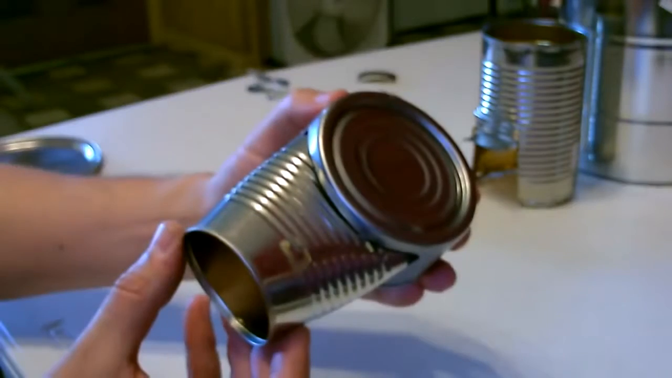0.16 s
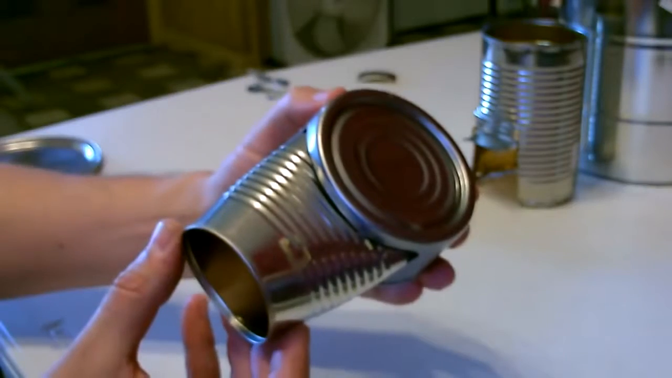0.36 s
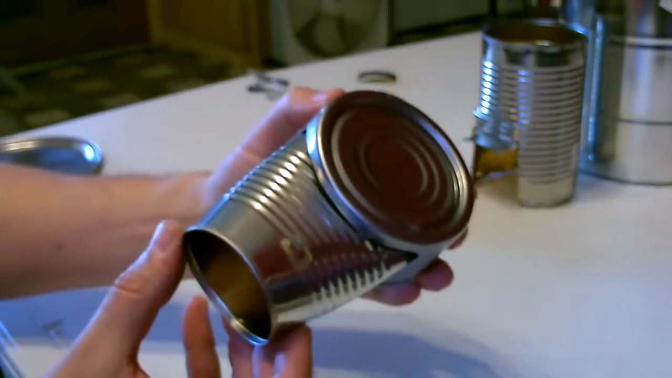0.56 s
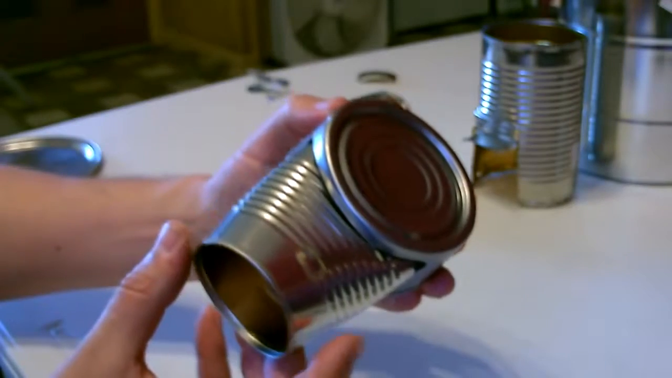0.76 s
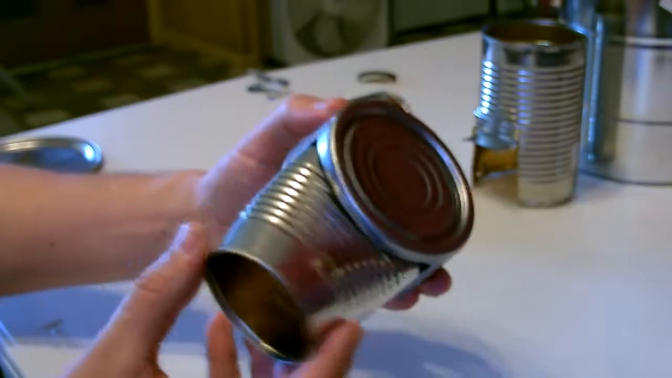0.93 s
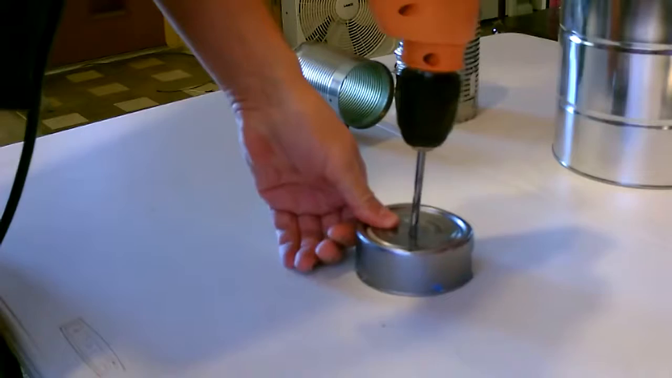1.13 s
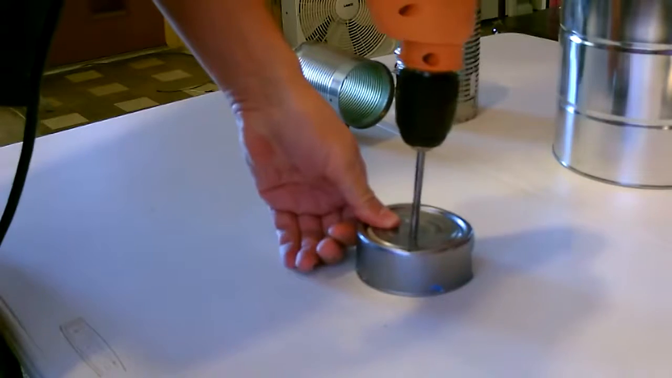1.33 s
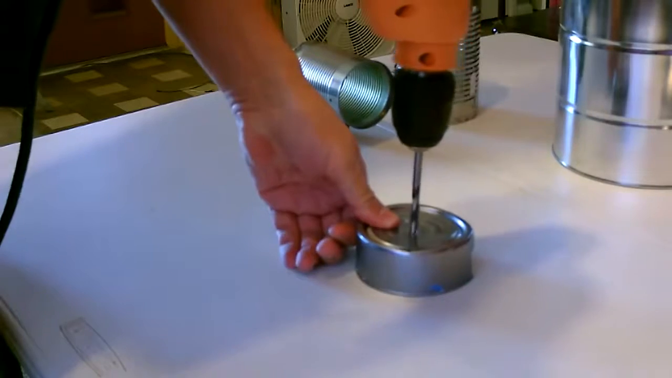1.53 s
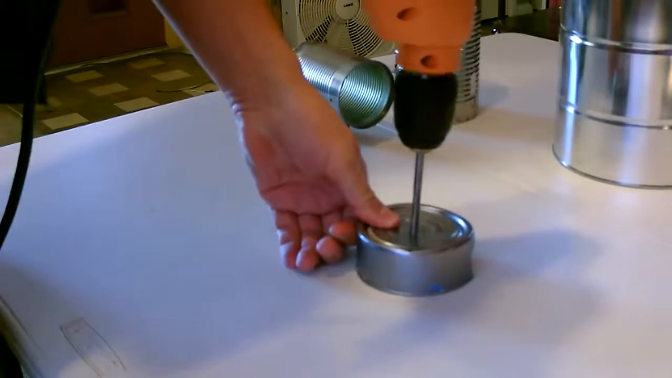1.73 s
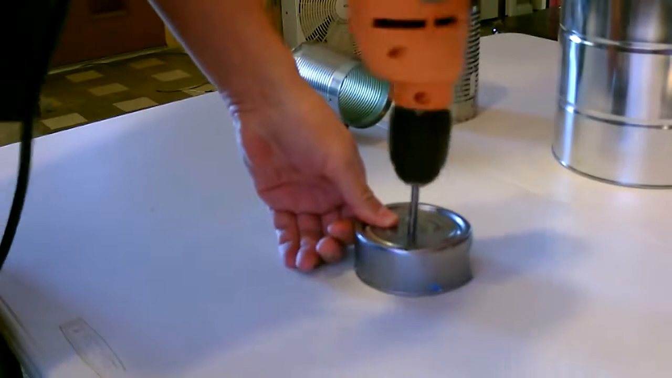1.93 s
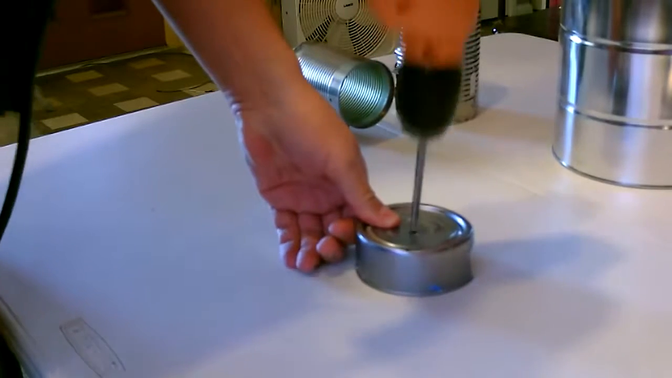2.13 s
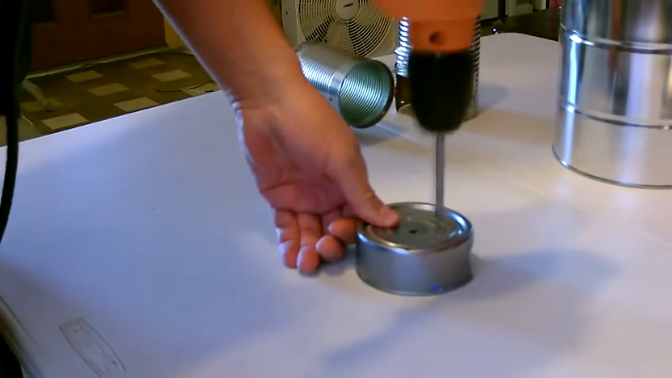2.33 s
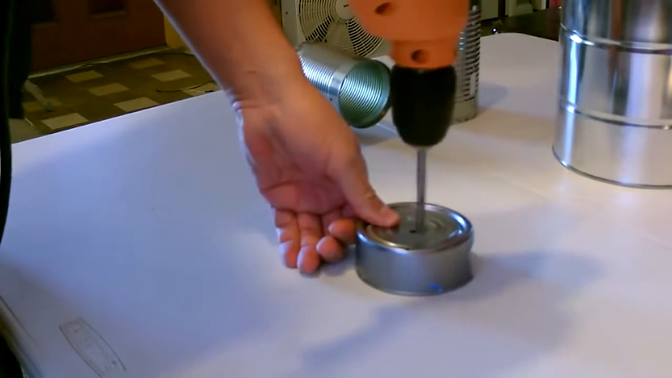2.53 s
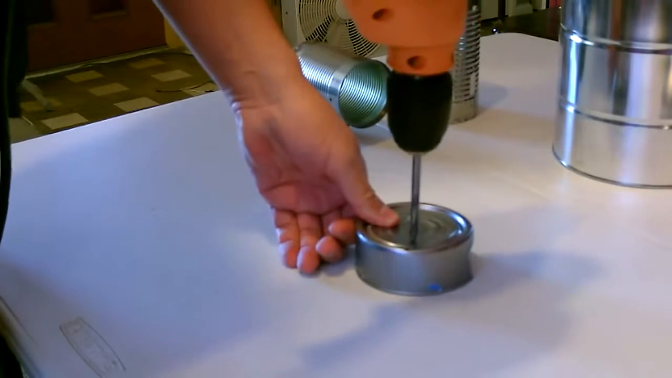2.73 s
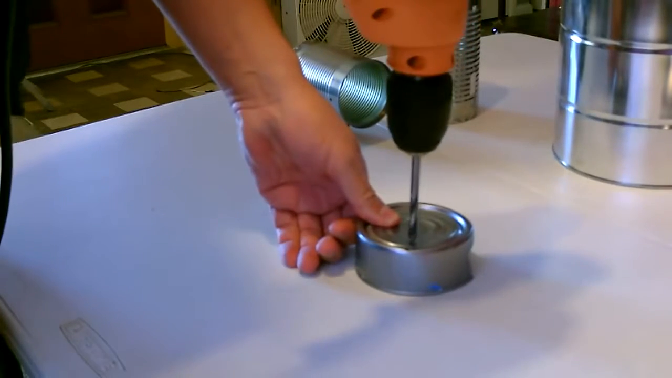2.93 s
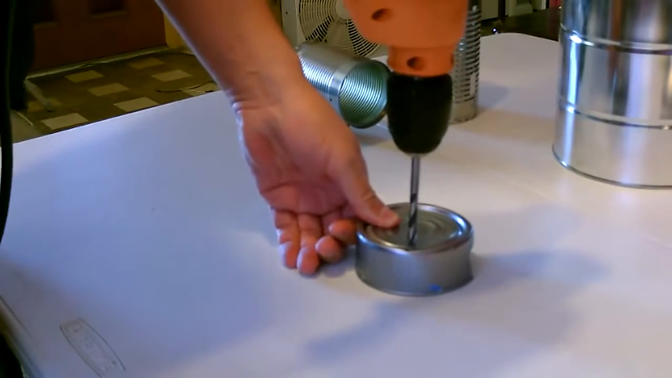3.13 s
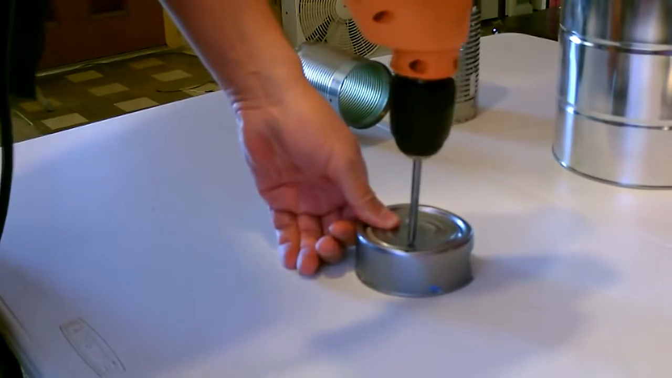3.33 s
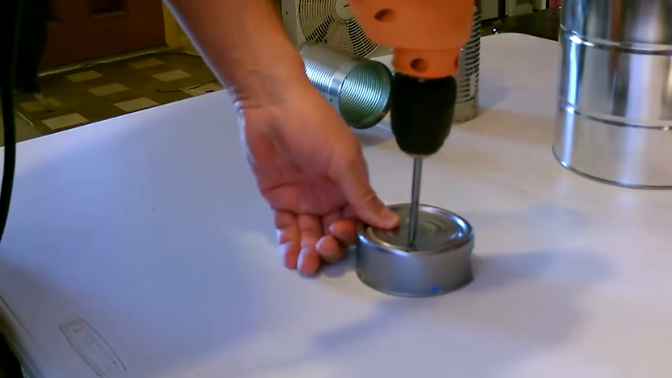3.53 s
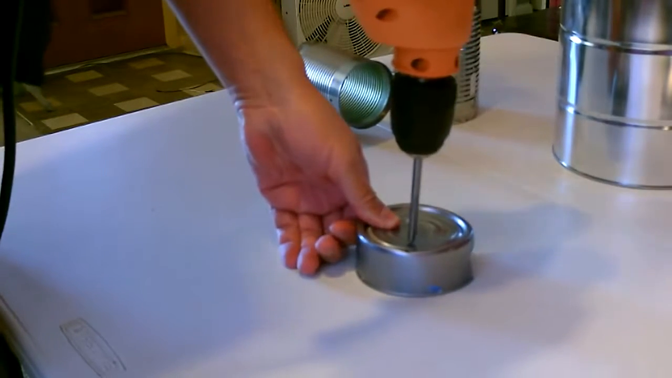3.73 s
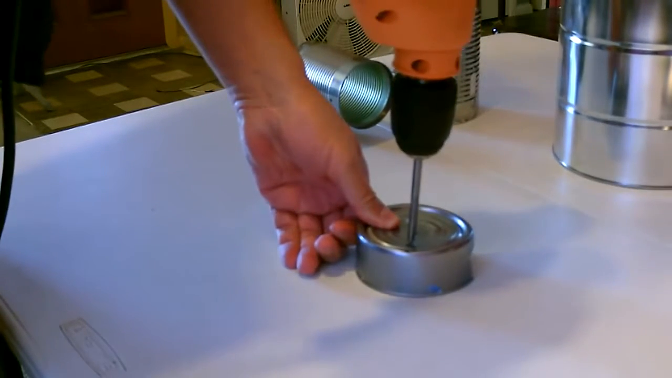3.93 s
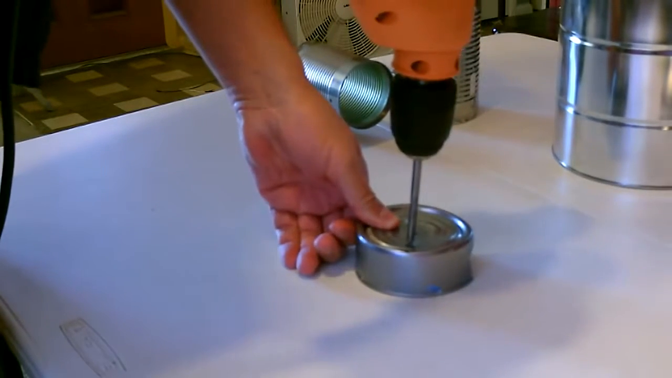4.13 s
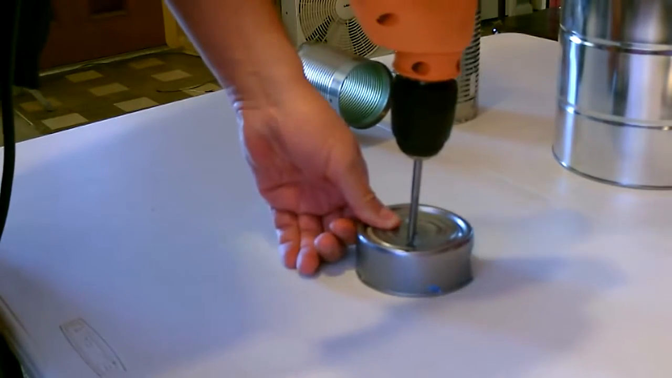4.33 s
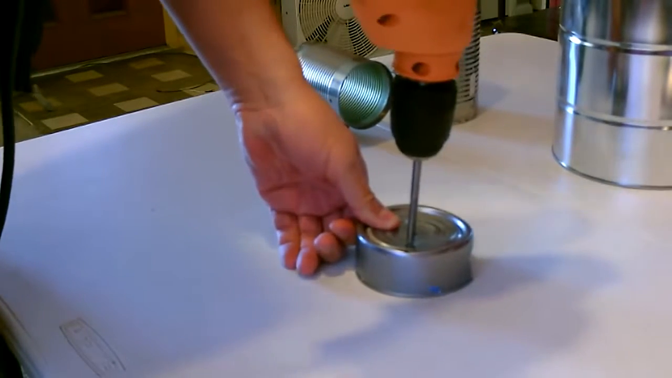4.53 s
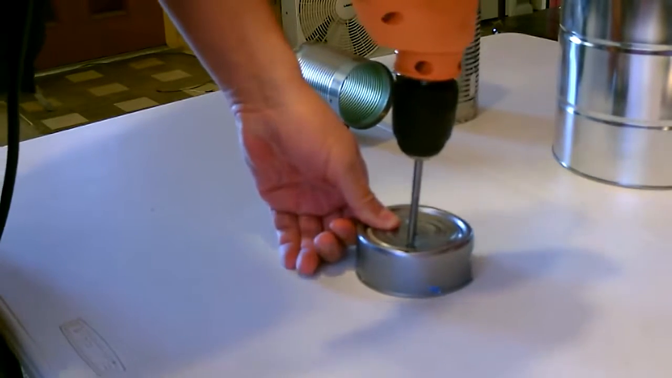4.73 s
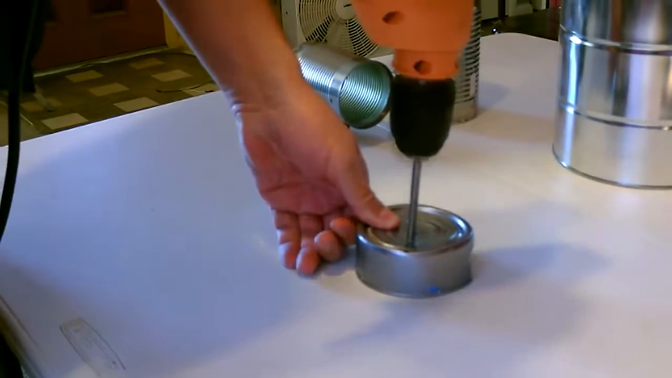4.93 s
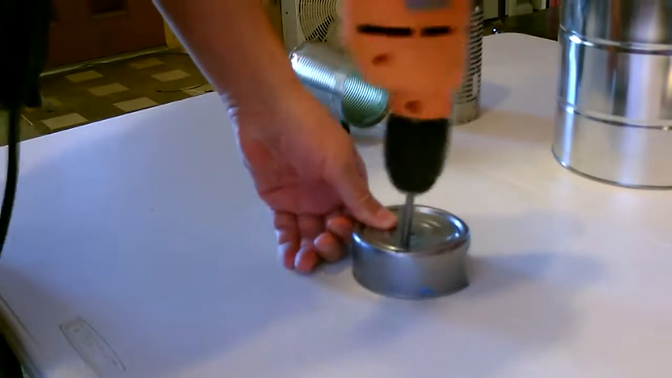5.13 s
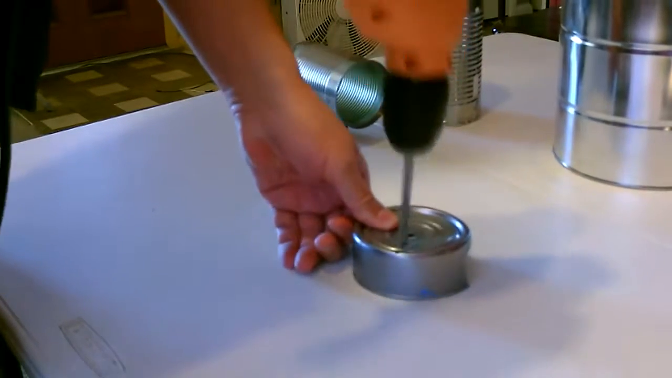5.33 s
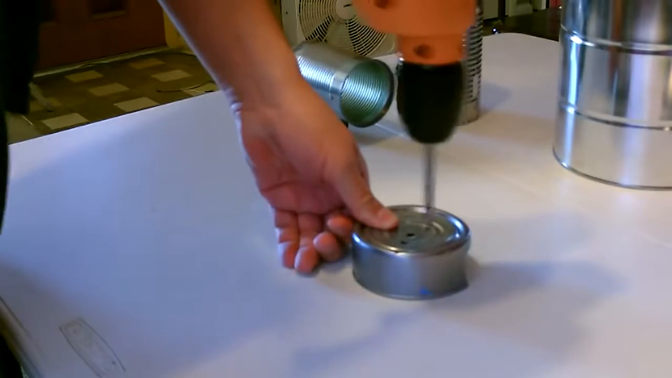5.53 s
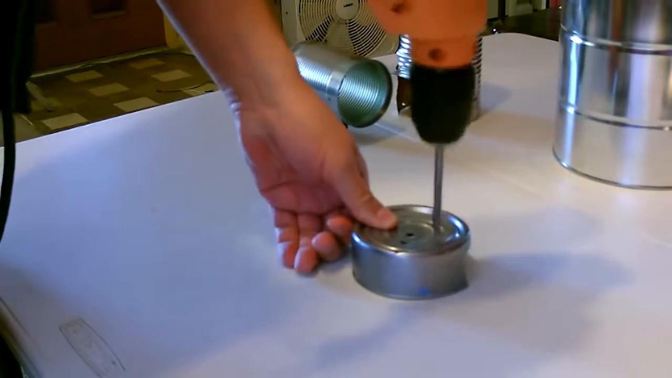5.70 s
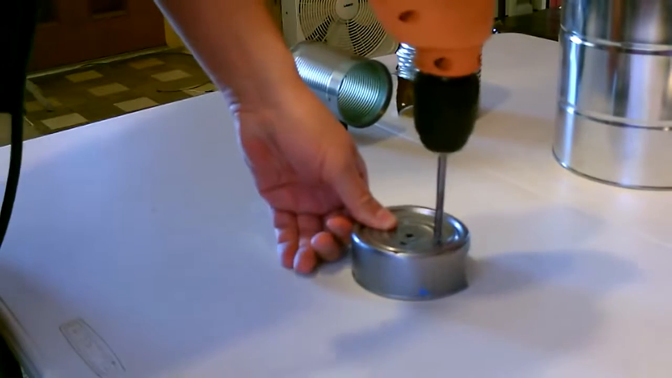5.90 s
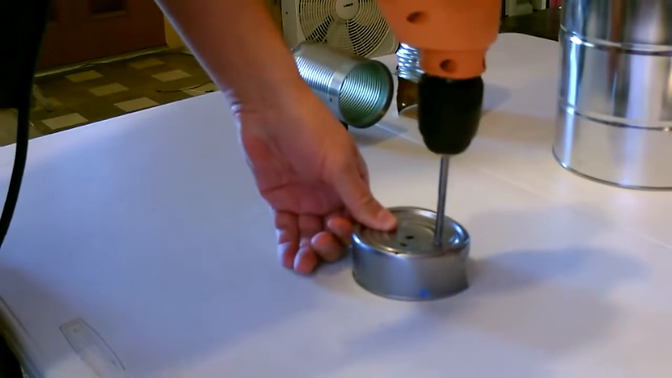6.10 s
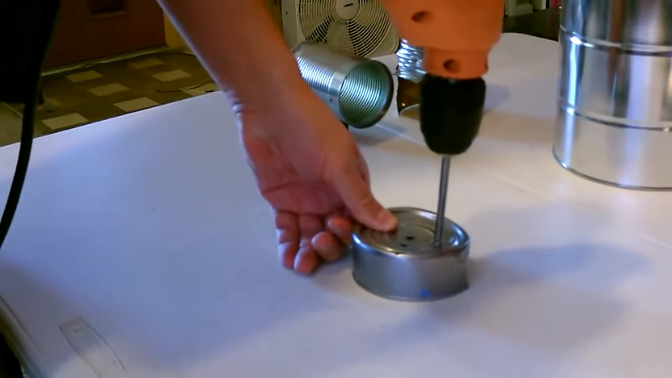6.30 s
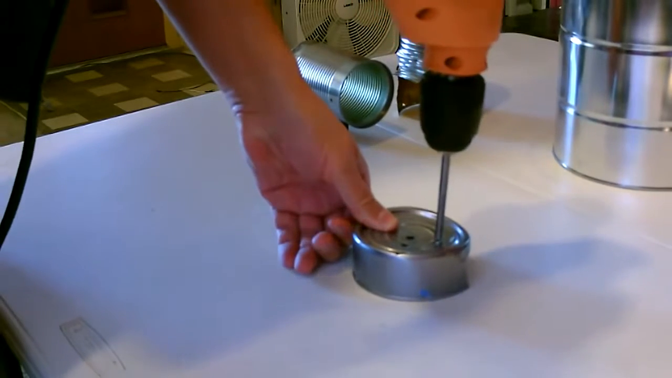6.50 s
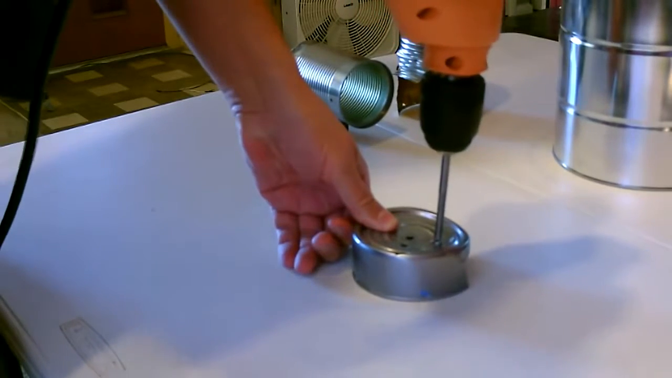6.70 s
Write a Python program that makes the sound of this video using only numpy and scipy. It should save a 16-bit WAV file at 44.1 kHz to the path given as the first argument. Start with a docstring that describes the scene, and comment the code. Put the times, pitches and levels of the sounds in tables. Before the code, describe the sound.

After a second of soft fan air, a corded drill snarls in bursts on thin steel, squealing briefly, clattering on breakthrough and winding down.

```python
"""Drilling through a steel can

A corded drill, squeezed in short bursts, bores through the base of an upturned steel can on a table.
The motor whine is a set of sines that rise under mains power and slide down as it coasts. Gears, cutting
edge and table are noisy contacts shaking resonances; can knocks, gear ticks and trigger clicks are struck
modes. A floor fan breathes in the room as smooth shaped noise, joined by a faint steady hum."""
import sys
import numpy as np
from scipy import signal
from scipy.fft import rfft, irfft, next_fast_len
from scipy.io import wavfile
from scipy.ndimage import uniform_filter1d

SR = 44100
rng = np.random.default_rng(int(sys.argv[2]) if len(sys.argv) > 2 else 0)


def to_wav(s):
    """Save 16-bit WAV."""
    ch = np.atleast_2d(s).T  # columns
    pcm = np.round(np.clip(ch, -1, 1) * 32767)  # PCM
    wavfile.write(sys.argv[1], SR, pcm.astype(np.int16))


def gain_from_decibels(decibels):
    """Convert decibel values to linear amplitude factors."""
    exponent = np.asarray(decibels, float) / 20
    return 10 ** exponent


N = 298116   # length in samples

# motor speed: t/s, commutator pitch f/Hz
MOTOR_SPEED = [(1.26, 120.6), (1.34, 1650), (1.39, 2300), (1.63, 599.2), (1.74, 299.3), (1.81, 2050),
               (1.89, 2826), (2.0, 2420), (2.2, 1910), (2.45, 1535), (2.92, 600), (3.2, 279), (3.3, 120),
               (3.45, 120.4), (3.52, 1860), (3.57, 2292), (3.61, 2456), (3.67, 2170), (4.0, 1420),
               (4.28, 790), (4.32, 812), (4.4, 1930), (4.46, 2150), (4.56, 1860), (4.8, 1830), (4.89, 2855),
               (4.94, 3140), (5.1, 2500), (5.3, 2010), (5.6, 1425), (5.93, 770), (6.05, 590), (6.3, 690),
               (6.35, 1788), (6.41, 2510), (6.5, 3500), (6.55, 3795), (6.76, 3560)]
# gear housing resonances: f/Hz, width/Hz, relative level/dB
HOUSING_RESONANCES = [(1852, 154, -5), (2050, 326, -2.5), (2320, 220, -4.5), (2633, 240, -3),
                      (3006, 640, -2), (3700, 610, -1.5), (3940, 460, -6.5)]
REFERENCE_HZ = 2000   # motor pitch at which the speed-dependent levels are given


def rms_one(x):
    """Scale to an average strength (rms) of 1."""
    return x / np.sqrt(np.mean(x ** 2) + 1e-20)


def in_time(rows):
    """Join the points of each column by straight lines, one value a sample."""
    s, *columns = np.transpose(rows)
    return [np.interp(np.arange(N) / SR, s, column) for column in columns]


def coloured(x, points):
    """Filter x by a curve of (Hz, dB) points joined on a log-frequency axis."""
    size = next_fast_len(N + 4096)
    hz, db = np.transpose(points)
    log_hz = np.log(np.arange(size // 2 + 1) * SR / size + 1)
    gain = gain_from_decibels(np.interp(log_hz, np.log(hz), db))
    return irfft(rfft(x, size) * gain, size)[:N]


def drift(rate_hz):
    """Slow random wandering of rms 1: noise smoothed twice."""
    r = np.exp(-2 * np.pi * rate_hz / SR)
    noise = rng.standard_normal(N + SR)
    return rms_one(signal.lfilter([1], [1, -2 * r, r * r], noise)[SR:])


def ring(clicks, hz, t60):
    """A unit click starts a sine of height about 1 that dies by 60 dB in t60 seconds."""
    r = gain_from_decibels(-60 / (t60 * SR))
    w = 2 * np.pi * hz / SR
    return signal.lfilter([0, np.sin(w)], [1, -2 * r * np.cos(w), r * r], clicks + 1e-18)


def ring_time(width_hz):
    """The narrower a resonance, the longer it takes to die by 60 dB, in s."""
    return np.log(1000) / np.pi / width_hz


def grains(per_s, spread_db, hiss):
    """Random contacts of uneven size over a bed of noise."""
    sizes = gain_from_decibels(spread_db * np.minimum(rng.exponential(1, N), 5)) * rng.choice([-1, 1], N)
    contacts = sizes * (rng.random(N) < per_s / SR)
    return rms_one(contacts) + hiss * rng.standard_normal(N)


def body(force, resonances):
    """One force shakes resonances side by side, with alternating signs; rms 1."""
    out = np.zeros(N)
    for k, (hz, width, db) in enumerate(resonances):
        out += (-1) ** k * gain_from_decibels(db) * np.sqrt(width) * ring(force, hz, ring_time(width))
    return rms_one(out)


def struck(events, modes, spread_db, below_db, contact_s):
    """Every blow reaches each mode with its own strength, sign and delay; a third column tilts it bright or dull."""
    rows = np.array(events)
    tilt = rows[:, 2] if rows.shape[1] > 2 else 0
    chance = rng.normal(0, 1, (len(rows), len(modes), 3))
    out = np.zeros(N)
    for k, (hz, db, t60) in enumerate(modes):
        delay = contact_s * np.abs(chance[:, k, 1])
        at = np.round((rows[:, 0] + delay) * SR).astype(int)
        strength_db = rows[:, 1] + db - below_db + tilt * np.log2(hz / 1300)
        strength_db = strength_db + spread_db * chance[:, k, 0]
        clicks = np.zeros(N)
        clicks[at] = gain_from_decibels(strength_db) * np.sign(chance[:, k, 2])
        out += ring(clicks, hz, t60)
    return out


def swells(rows, rise_db_per_s):
    """Level in dB of sounds that each rise, hold and fall; the loudest counts."""
    t = np.arange(N) / SR
    levels = []
    for s, db, hold, fall in rows:
        missing_db = np.maximum(rise_db_per_s * (s - t), fall * (t - s - hold))
        levels.append(db - np.maximum(0, missing_db))
    return np.max(levels, axis=0)


def kept_ringing(level_db, resonances):
    """Dense small contacts keep narrow modes sounding."""
    return gain_from_decibels(level_db) * body(grains(1100, 4.7, hiss=0.9), resonances)


def pull():
    """How hard the trigger feeds mains pulses, 0-1."""
    # trigger held: from t/s, to t/s, depth of the mains pulsing/0-1
    held = [(1.28, 1.406, 0), (1.795, 1.952, 0.43), (3.487, 4.898, 0.62), (6.073, 6.298, .5),
            (6.362, 6.754, 1)]
    ramp_s = 0.13   # each ramp is half way at the listed time
    t = np.arange(N) / SR
    depths = []
    for on, off, depth in held:
        gate = np.clip(np.minimum(t - on, off - t) / ramp_s + .5, 0, 1)
        depths.append(np.clip(depth, 0, 1) * gate)
    return np.max(depths, axis=0)


def torque_pulse(sharp):
    """The torque beats twice in each mains cycle while the trigger is pulled."""
    pulse_hz = 120
    beat = np.cos(np.pi * pulse_hz * (np.arange(N) / SR - .0007)) ** 2
    return 1 + pull() * (rms_one(beat ** sharp) - 1)


def fan():
    """Far, smooth air noise, and a faint steady hum from 1.16 s on."""
    # colour of the air noise: f/Hz, relative level per Hz/dB
    air_colour = [(18, -83.5), (30, -36), (65, -48), (102, -16.5), (177, -13), (266, -12), (308, -7),
                  (497, -0.5), (574, -4), (632, -2), (1100, -18.5), (1430, -19.5), (2200, -30.5),
                  (9290, -45.5), (12100, -36), (20400, -120)]
    t = np.arange(N) / SR
    hum_level = gain_from_decibels(-53.5 + 0.41 * drift(5.7))
    hum = (t > 1.16) * hum_level * np.sin(2 * np.pi * 243 * t)
    noise = rms_one(coloured(rng.standard_normal(N), air_colour))
    return gain_from_decibels(-45.5 + 0.1 * drift(5.0)) * noise + hum


def room(x):
    """Echoes from the walls blur into a dull tail of decaying noise."""
    t60_s, tail_db = 0.22, -8
    t = np.arange(SR // 2) / SR
    dull_noise = signal.lfilter([.5], [1, -.5], rng.standard_normal(len(t)))
    tail = dull_noise * gain_from_decibels(-60 * t / t60_s) * (t > .004)   # a short gap comes first
    return gain_from_decibels(tail_db) * signal.fftconvolve(x, tail / np.sqrt(np.sum(tail ** 2)))[:N]


def trigger_clicks():
    """The trigger switch snaps and its small parts ring very briefly."""
    # clicks: t/s, strength/dB
    clicks = [(1.2515, -20), (1.276, -22), (1.7199, -16.5), (3.2375, -38), (3.4296, -30), (3.473, -38)]
    # switch modes: f/Hz, relative level/dB, time to die by 60 dB t/s
    switch_modes = [(1430, -2.5, 0.016), (2370, 7, 0.012), (4020, 1, 0.026), (5270, -11, 0.014),
                    (6570, 2.5, 0.016), (8300, -10, 0.013), (9350, -9, 0.013)]
    return struck(clicks, switch_modes, spread_db=3.0, below_db=18, contact_s=0.0004)


def gear_lash():
    """Loose gears knock the housing, singly and in runs."""
    # lone ticks: t/s, strength/dB
    lone_ticks = [(1.276, -19), (2.3254, -23), (2.3521, -20), (2.4249, -21), (2.5127, -23), (3.048, -33),
                  (3.2375, -34), (5.688, -25), (5.9814, -31), (6.0626, -27), (6.0935, -25), (6.117, -22),
                  (6.3415, -18)]
    # runs of nearly even ticks: first t/s, last t/s, gap t/s, first strength/dB, last strength/dB
    tick_runs = [(2.542, 2.78, .0455, -22, -26), (2.9228, 2.96, .0366, -34, -34),
                 (5.5837, 5.82, .0427, -26, -25), (6.0187, 6.05, .0245, -31, -31),
                 (6.147, 6.285, 1 / 60, -24, -23)]
    jitter_s = .002
    modes = [(hz, db, ring_time(width)) for hz, width, db in HOUSING_RESONANCES]
    ticks = list(lone_ticks)
    for first, last, gap, first_db, last_db in tick_runs:
        for s in np.arange(first, last, gap):
            db = np.interp(s, [first, last], [first_db, last_db])
            ticks.append((s + jitter_s * rng.normal(), db))
    return struck(ticks, modes, spread_db=3.0, below_db=4, contact_s=.0008)


def can_knocks():
    """The bit catches and knocks the can, whose thin steel rings."""
    # catches: t/s, strength/dB, brightness/dB per octave
    catches = [(1.346, -21.5, 8), (1.927, -7, 0.5), (1.959, -3.5, -10), (1.996, -12, 6), (2.004, -15, 0),
               (2.023, -11, -10), (2.146, -10, -5), (2.227, -13.5, 9), (2.83, -36, -13), (2.887, -31, -27),
               (5.134, -5, -1.5), (5.156, -5.5, -32), (5.169, -5, -10), (5.18, -2, 4.5), (5.184, -9, -0.5),
               (5.207, -3.5, -23), (5.311, -12, -11), (5.394, -7.5, -10), (5.414, -5, -8), (5.458, -12, 1),
               (5.487, 2, -7.5), (5.938, -20.5, -6)]
    # can modes: f/Hz, relative level/dB, time to die by 60 dB t/s
    can_modes = [(830, -64, 0.0083), (950, -8.5, 0.053), (1184, -3, 0.024), (1246, 13, 0.014),
                 (1380, -11, 0.019), (1443, -15, 0.037), (1700, -22, 0.035), (2120, -5, 0.072),
                 (2757, 5, 0.028), (2900, -3, 0.025), (3500, -35, .012), (5260, -22, 0.021)]
    return struck(catches, can_modes, spread_db=-0.5, below_db=10.5, contact_s=0.001253)


def singing():
    """Small contacts sustain the pierced base on two close modes, the bit and the housing on one each."""
    # the can sings while the bit sticks through its base: t/s, level/dB, hold t/s, fall/dB per s
    can_swells = [(1.98, -12.5, 0.023, 150), (2.1, -25, .1, 200), (2.232, -17, 0.0061, 280),
                  (5.12, -20, .03, 47), (5.41, -17.5, .01, 400), (5.44, -24.5, 0.071, 201)]
    # the bit hums while it rides on the unbroken base: t/s, level/dB, hold t/s, fall/dB per s
    bit_swells = [(1.3, -42, 0.12, 100), (1.44, -27, 0.058, 113), (1.9, -23, 0.035, 500)]
    # the gear housing rings at part speed: t/s, level/dB, hold t/s, fall/dB per s
    housing_swells = [(3.918, -31.5, .005, 86.3), (4.36, -34.5, .005, 40.1), (4.696, -30, .005, 50)]
    can = kept_ringing(swells(can_swells, rise_db_per_s=350), [(1250, 58, -8.5), (1395, 20, -8.0)])
    bit = kept_ringing(swells(bit_swells, rise_db_per_s=263), [(1780, 140, 0)])
    housing = kept_ringing(swells(housing_swells, rise_db_per_s=85), [(2640, 98, 0)])
    return can + bit + housing


def whine():
    """Commutator tones: the first order squeals in mains beats under power, higher ones slide down in a coast."""
    # squeals as the motor spins up: t/s, level/dB, hold t/s, fall/dB per s
    squeals = [(1.385, -30, 0.015, 700), (1.845, -20, 0.03, 450), (3.56, -24, .015, 450),
               (4.45, -31, 0.017, 350), (4.86, -16.5, 0.019, 426), (6.4, -19, 0.015, 171)]
    # orders of the coasting whine: multiple of the pitch, relative level/dB
    orders = [(2, 2), (2.97, -3), (4, 3), (5.7, -5), (8, -9)]
    # how the motor shell lets the whine out: f/Hz, level/dB
    shell_hz, shell_db = np.transpose([(1000, -30), (1700, -6), (2300, -1), (2800, -5), (3300, 0),
                                       (3900, 2), (4700, -2), (5600, -10), (6500, -22), (12000, -60)])
    hz, = in_time(MOTOR_SPEED)
    phase = 2 * np.pi * np.cumsum(hz * (1 + 0.00618 * drift(104))) / SR

    squeal_level = gain_from_decibels(swells(squeals, rise_db_per_s=480)) * torque_pulse(1.4)
    squeal = squeal_level * (np.sin(phase) + gain_from_decibels(-19) * np.sin(2 * phase))

    # loudest in a free coast, drowned when power or load changes the speed otherwise
    free_coast_hz_per_s, loss_db_per_khz_per_s = 2100, 6.0
    slowing = -uniform_filter1d(np.gradient(hz) * SR, size=SR // 25)   # Hz per s
    coast_db = -44 + 5.5 * np.log2(hz / REFERENCE_HZ)
    coast_db = coast_db - loss_db_per_khz_per_s * np.abs(slowing - free_coast_hz_per_s) / 1000
    coast = np.zeros(N)
    for multiple, db in orders:
        order_db = coast_db + db + np.interp(multiple * hz, shell_hz, shell_db) + 1.5 * drift(30)
        coast += gain_from_decibels(order_db) * np.sin(multiple * phase)
    wobble = 1 + 0.49 * np.cos(phase / 12)   # once a rotor turn
    return np.sqrt(2) * (squeal * gain_from_decibels(3.4 * drift(48)) + coast * wobble)


def table_rumble(rumble_db):
    """Rough contacts, pulsing with the torque, shake the table; jolts add to its low resonances."""
    # table resonances: f/Hz, width/Hz, relative level/dB
    table_resonances = [(357.5, 22.4, -1.5), (450, 87, -2), (541, 24.5, 1), (602.3, 16, -2.5),
                        (695, 36, -1.5), (818, 78, -4)]
    # low table resonances: f/Hz, width/Hz, relative level/dB
    low_resonances = [(139, 100, -4), (244.4, 18.6, 5)]
    # jolts into the table: t/s, level/dB, hold t/s, fall/dB per s
    jolts = [(1.34, -35, .005, 260), (2.04, -29, .005, 210), (3.5, -40.5, 0.027, 110),
             (3.79, -43.5, .005, 50), (5.06, -33.5, .11, 300), (5.22, -20.5, 0.05, 210),
             (5.49, -38, .005, 450), (6.13, -39, 0.0042, 230), (6.75, -35, .005, 200)]
    # between jolts the low part stays 17 dB under the rumble
    thud_db = np.maximum(swells(jolts, rise_db_per_s=400), rumble_db - 17)
    shake = grains(600, 4.1, hiss=0.99) * torque_pulse(0.13)
    thud = body(shake, low_resonances) * gain_from_decibels(thud_db)
    return thud + body(shake, table_resonances) * gain_from_decibels(rumble_db + 0.5 * drift(25))


def edge_cutting(cut_db, chatter_db):
    """The cutting edge scrapes steel in many small bites that excite broad resonances."""
    # cutting edge on steel: f/Hz, width/Hz, relative level/dB
    edge_resonances = [(967, 158, 0), (1248, 350, 0), (1453, 138, 0), (1676, 86, -5.5)]
    return body(grains(1500, 2.95, hiss=1.0), edge_resonances) * gain_from_decibels(cut_db + chatter_db)


def gear_grind(gear_db, chatter_db):
    """Meshing gear teeth, pulsing with the torque, shake the gear housing."""
    mesh = grains(2500, 1.8, hiss=0.65) * torque_pulse(0.57)
    level_db = gear_db + 0.34 * chatter_db + 1.74 * drift(17)
    return body(mesh, HOUSING_RESONANCES) * gain_from_decibels(level_db)


def air_and_brushes(gear_db):
    """Air and brushes hiss with speed and work; the motor's own fan blows on while it coasts."""
    # colour of the hiss: f/Hz, relative level per Hz/dB; its end points are replaced below
    hiss_colour = [(2590, -30), (4400, -0.5), (5890, -5), (6610, -5.5), (8220, -8.5), (8840, -15.5),
                   (9290, -11), (12100, -35), (20400, -120)]
    octaves = np.log2(in_time(MOTOR_SPEED)[0] / REFERENCE_HZ)
    # the hiss follows 0.89 of the grind's swing about -30 dB, and gains up to 2 dB under power
    working_db = -33 + 3.5 * octaves + 0.89 * (gear_db + 30) + 2 * pull()
    cooling_db = -35.5 + 8.5 * octaves
    air_db = np.maximum(working_db, cooling_db)
    slope = [(1500, -6.5)] + hiss_colour[1:-2] + [(16000, -5)]
    hiss = grains(5000, 2.1, hiss=1.95) * torque_pulse(0.085)
    return rms_one(coloured(hiss, slope)) * gain_from_decibels(air_db + 1.0 * drift(28))


def drilling():
    """Table, cutting edge, gears and air together, following the work."""
    # the work: t/s, table rumble level/dB, cutting level/dB, gear grind level/dB
    work = [(1.24, -48, -60, -60), (1.3, -34.5, -39.5, -43), (1.345, -27, -22.5, -31),
            (1.42, -22.5, -26, -33), (1.47, -25.5, -33, -33.5), (1.54, -26, -26.5, -37.5),
            (1.62, -35.5, -42, -40), (1.71, -39, -55, -67), (1.745, -50, -50, -48), (1.79, -22, -19.5, -27),
            (1.85, -22, -22.5, -21), (1.94, -26, -20.5, -24), (2.05, -23, -18.5, -26),
            (2.13, -30, -30, -29), (2.165, -26.5, -25, -31.5), (2.21, -31, -24, -29), (2.24, -37, -17, -22),
            (2.29, -36, -22, -26), (2.32, -40, -32.5, -33.5), (2.45, -42.5, -41, -36.5),
            (2.67, -52, -49.5, -52.5), (2.96, -59, -54, -49), (3.21, -72, -63, -61.5),
            (3.42, -58, -63, -80), (3.47, -44, -53, -50.5), (3.51, -29.5, -34.5, -27.5),
            (3.66, -31, -32.5, -31), (3.8, -34.5, -38.5, -33.5), (4.09, -38, -42.5, -33.5),
            (4.27, -37.5, -44, -37), (4.4, -31, -33.5, -28.5), (4.78, -31, -38.5, -31.5),
            (4.86, -28, -30, -22), (4.94, -22, -20.5, -22), (5.02, -23, -24, -23),
            (5.07, -19.5, -22.5, -23), (5.16, -24, -24.5, -22.5), (5.21, -18, -20.5, -24),
            (5.27, -24, -23, -25.5), (5.48, -27.5, -24, -27), (5.55, -39, -36, -41.5),
            (5.62, -60, -42, -49), (5.75, -58, -49, -47), (6.03, -45, -49.5, -47), (6.13, -40, -49, -38),
            (6.28, -34.5, -43, -37), (6.42, -25, -28.5, -24), (6.5, -28, -23.5, -29),
            (6.6, -24, -25.5, -31), (6.76, -27.5, -28.5, -30.5)]
    rumble_db, cut_db, gear_db = in_time(work)
    on = np.arange(N) / SR > work[0][0]
    chatter_db = 1.18 * drift(95)   # the edge bites and slips, shaking bit and gears together
    cutting = edge_cutting(cut_db, chatter_db)
    gears = gear_grind(gear_db, chatter_db)
    return on * (table_rumble(rumble_db) + cutting + gears + air_and_brushes(gear_db))


def scene():
    """Drill, can and table close by, the fan behind; such small things radiate no deep bass."""
    background = fan()
    knocks = can_knocks() + trigger_clicks() + gear_lash()
    tones = whine()
    echoed = room(tones + .25 * knocks)
    close = tones + knocks + echoed + drilling() + singing()
    no_bass = signal.butter(3, 115, "high", fs=SR, output="sos")
    return (signal.sosfilt(no_bass, close) + background)[None]


def roll_off(x):
    """The treble ends steeply here."""
    return signal.sosfilt(signal.butter(12, 15720, fs=SR, output="sos"), x)


def record(dry):
    """The treble falls away steeply above about 9.5 kHz; peaks are rounded."""
    # overall response: f/Hz, level/dB
    response = [(20, -8), (100, -12), (9450, 4), (9650, -10.5), (10400, -36), (10800, -21), (13400, -27),
                (13700, -34), (15700, -38)]
    heard = coloured(dry[0], response)
    mix = 1.305 * np.tanh(heard / 1.258)
    return roll_off(mix[None])


dry = scene()
out = record(dry)
to_wav(out)
```